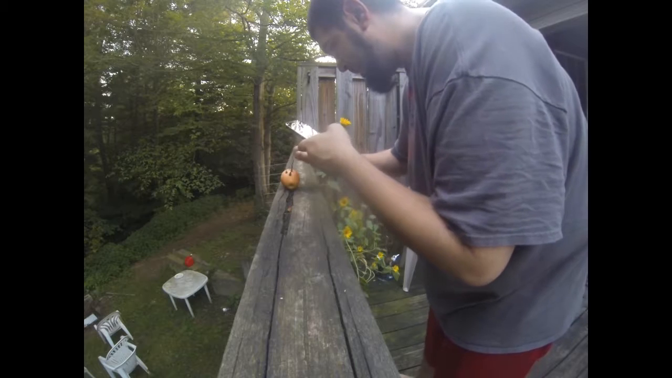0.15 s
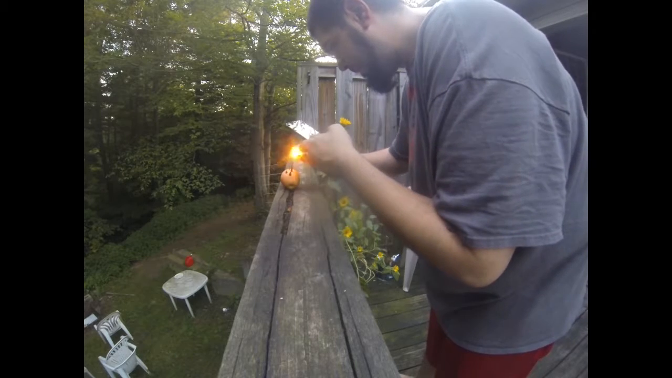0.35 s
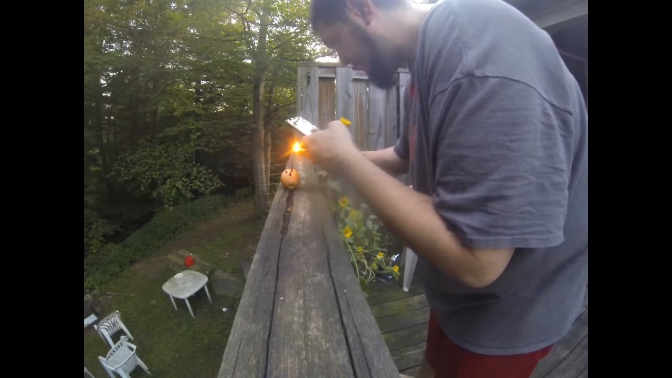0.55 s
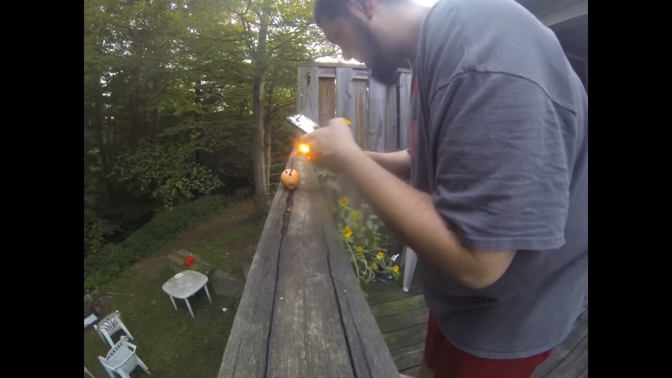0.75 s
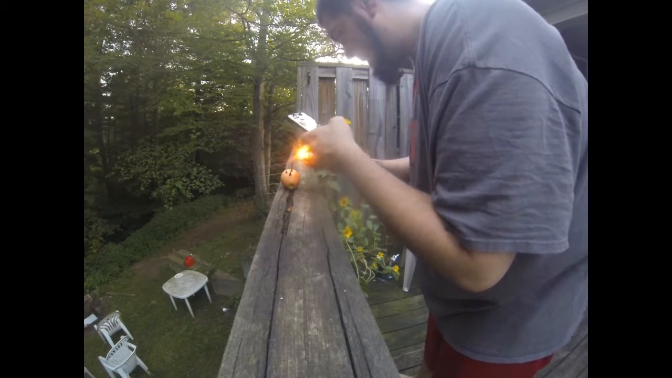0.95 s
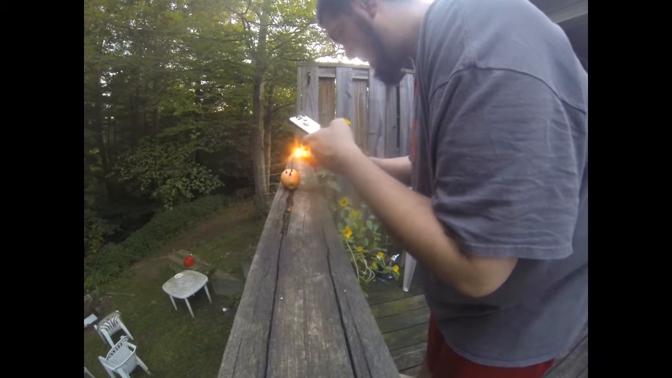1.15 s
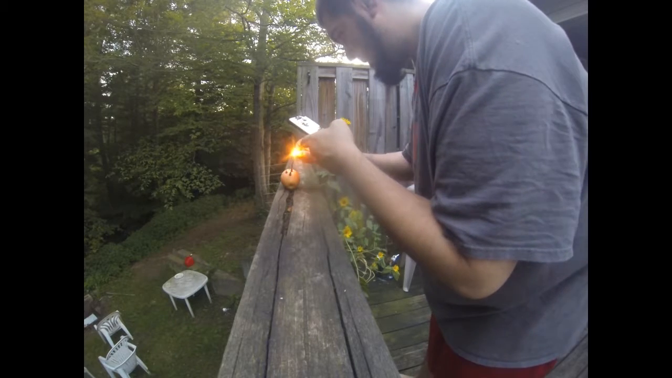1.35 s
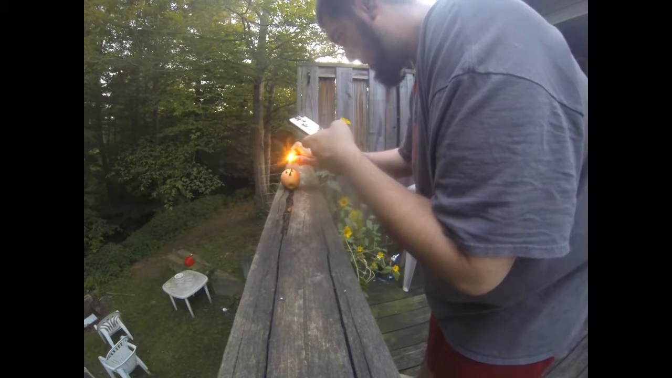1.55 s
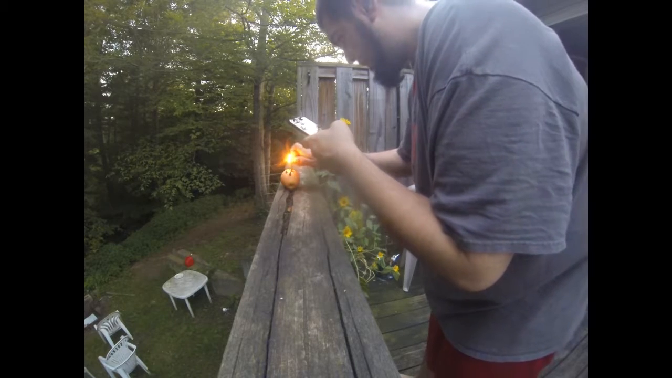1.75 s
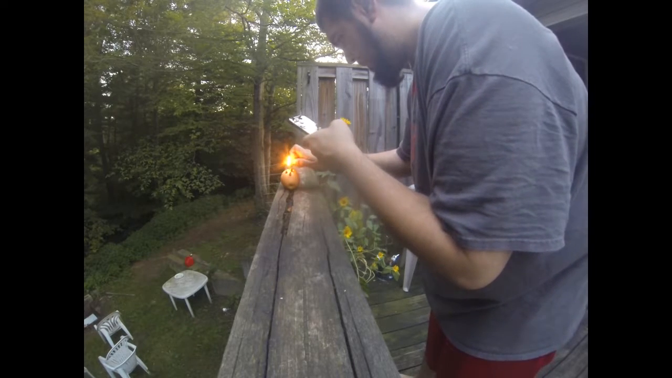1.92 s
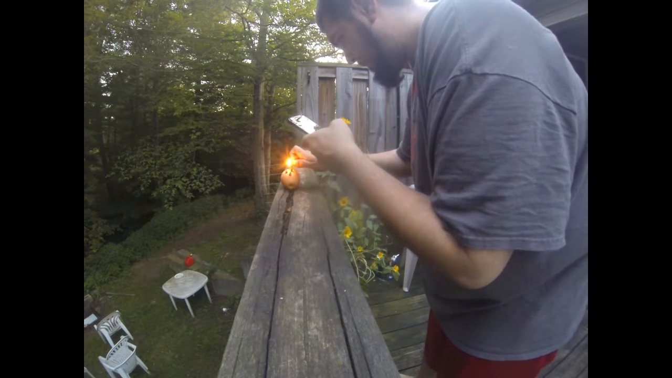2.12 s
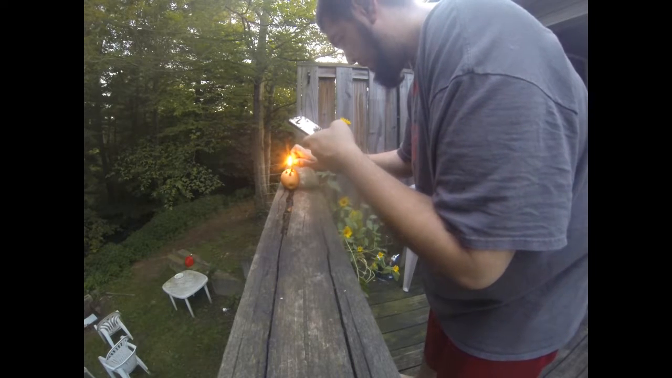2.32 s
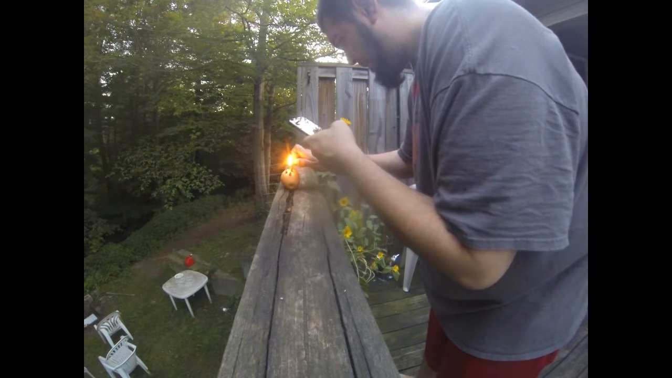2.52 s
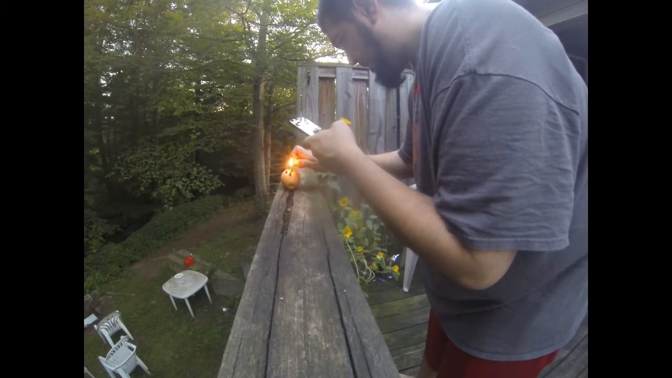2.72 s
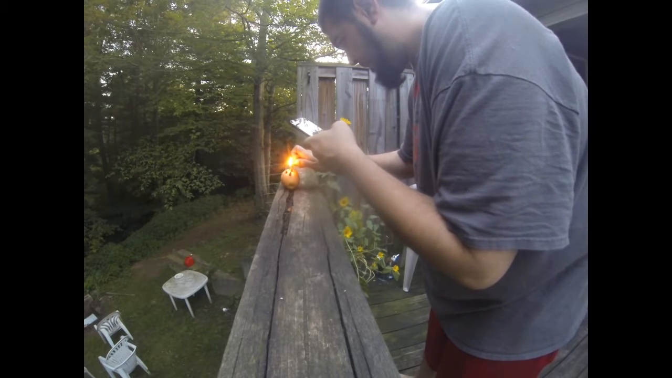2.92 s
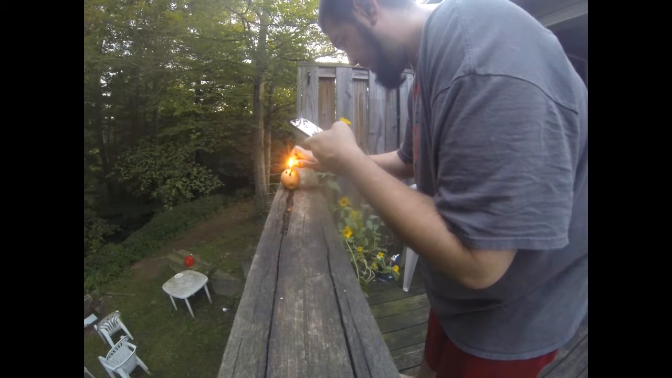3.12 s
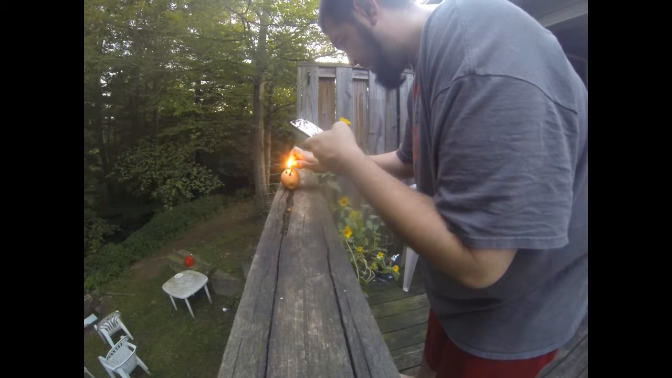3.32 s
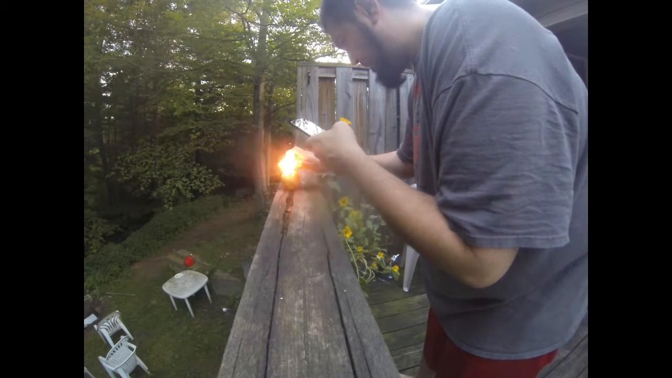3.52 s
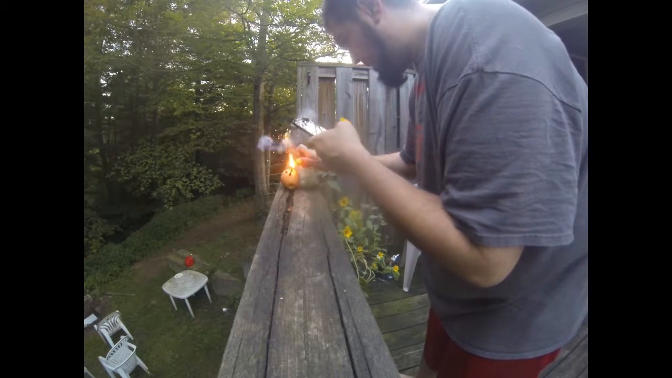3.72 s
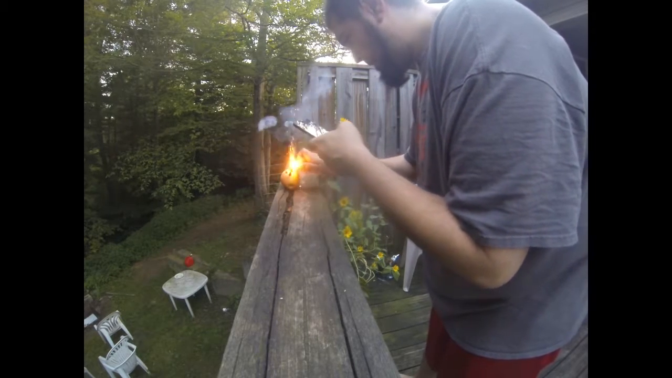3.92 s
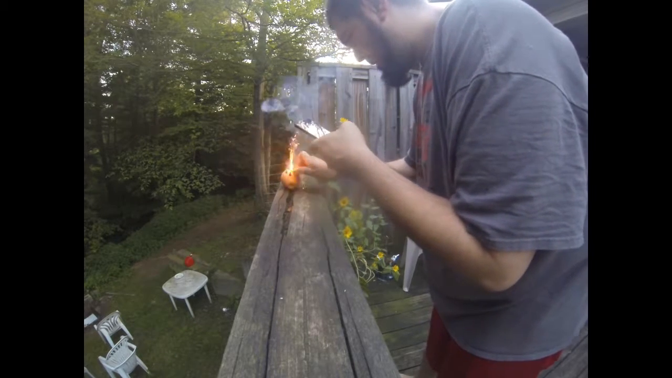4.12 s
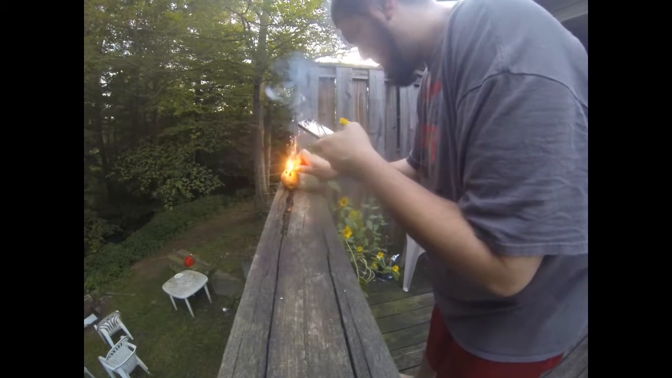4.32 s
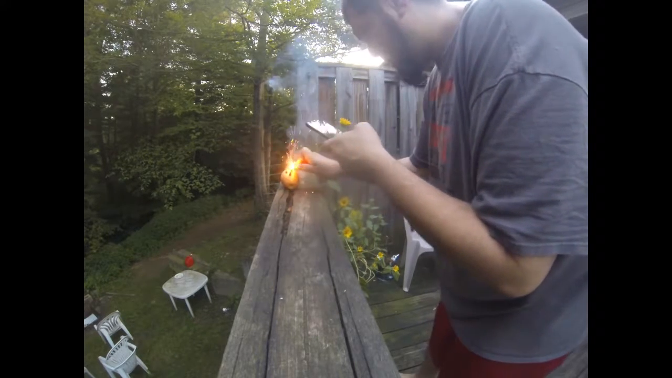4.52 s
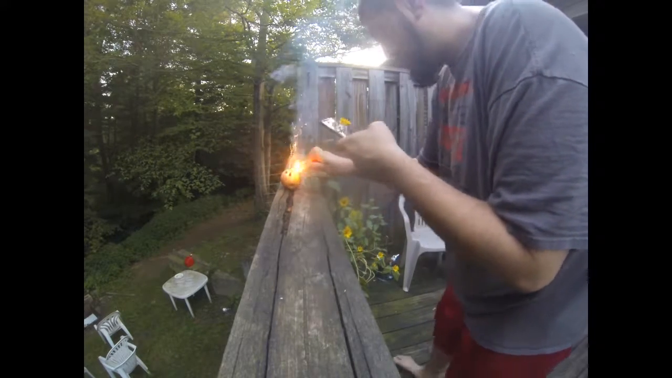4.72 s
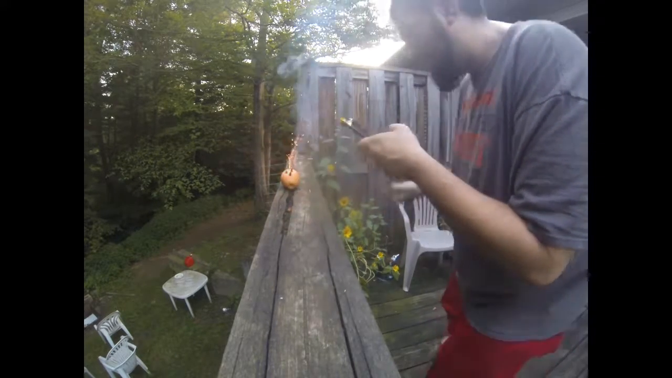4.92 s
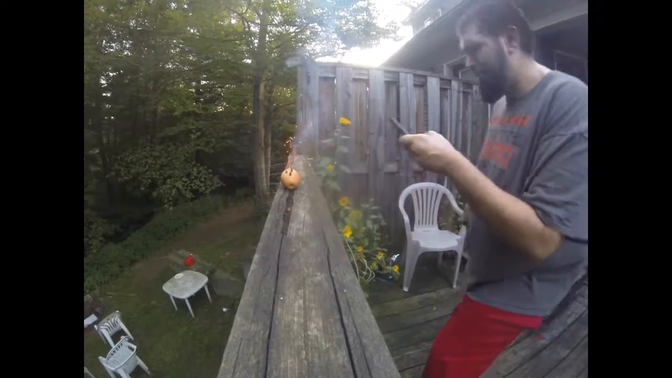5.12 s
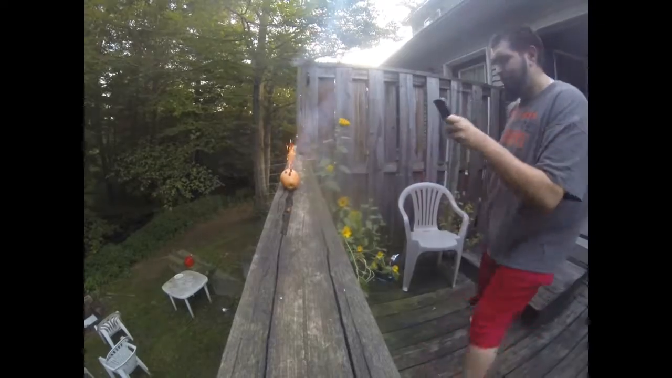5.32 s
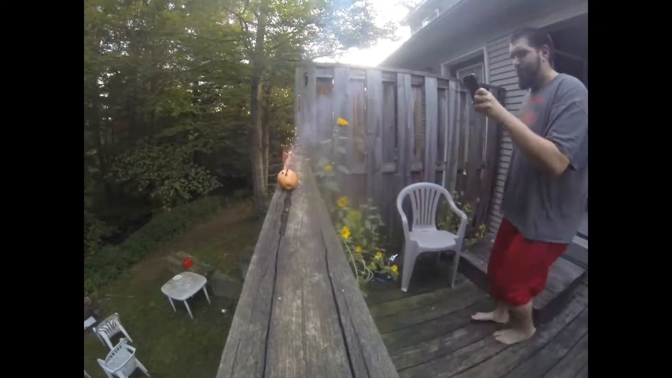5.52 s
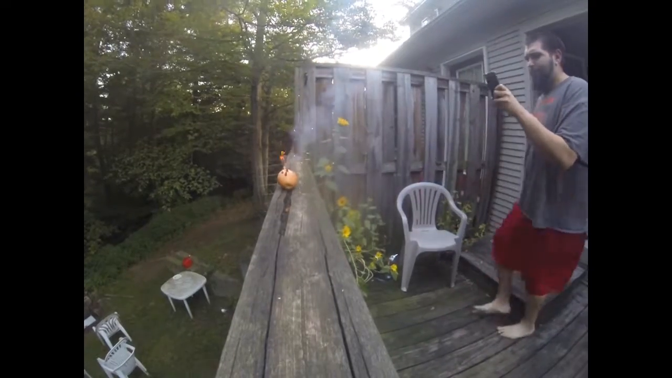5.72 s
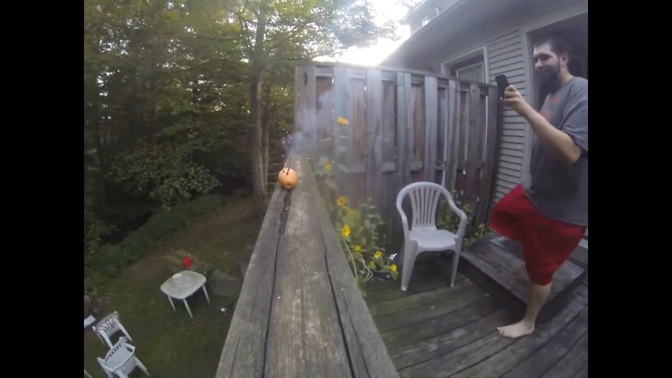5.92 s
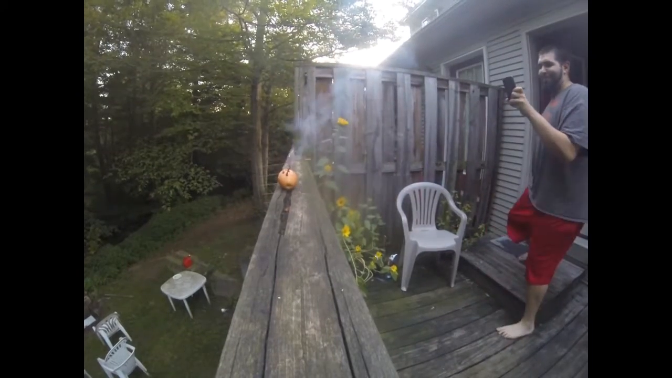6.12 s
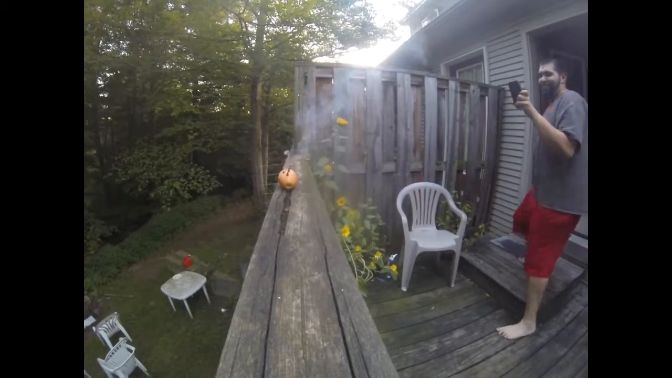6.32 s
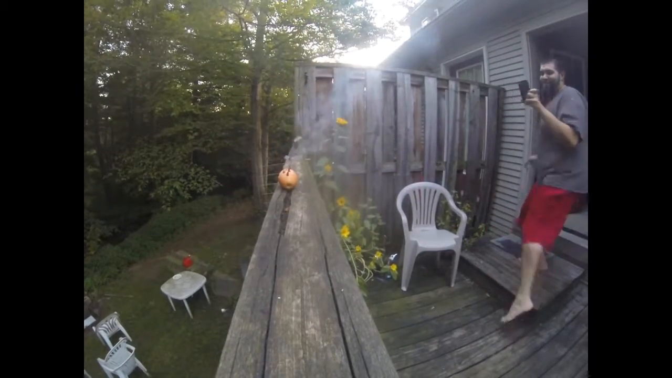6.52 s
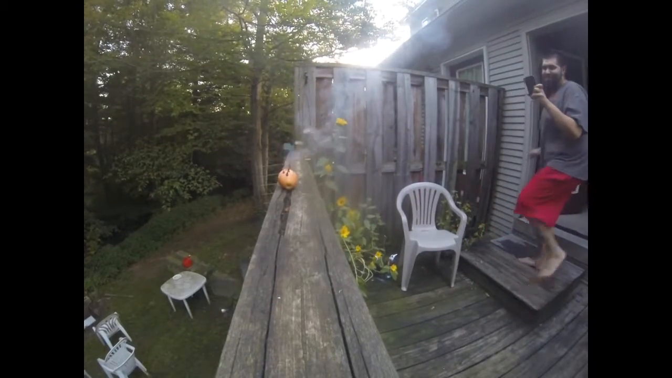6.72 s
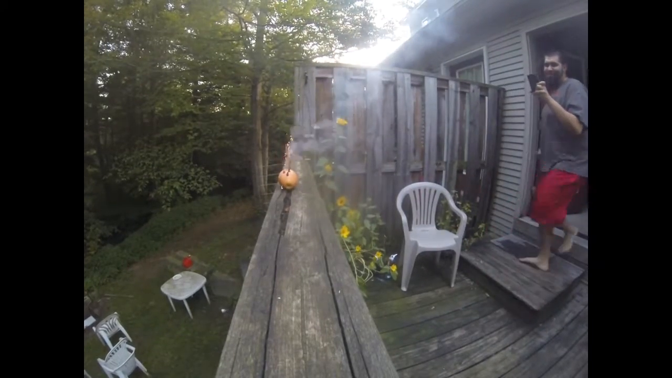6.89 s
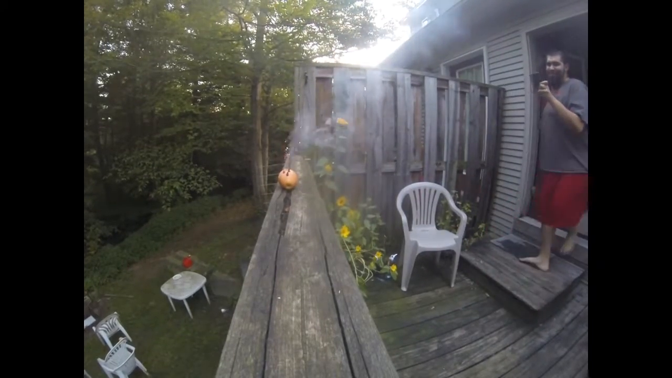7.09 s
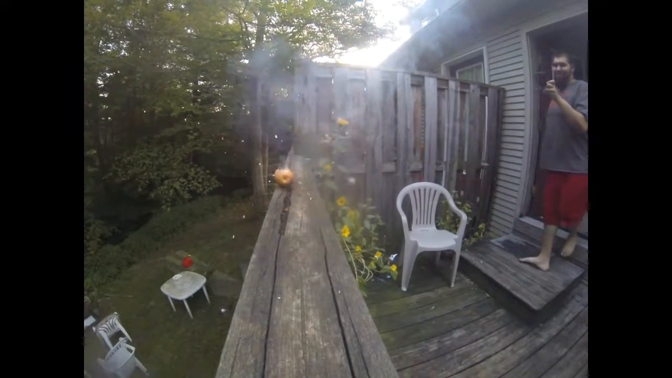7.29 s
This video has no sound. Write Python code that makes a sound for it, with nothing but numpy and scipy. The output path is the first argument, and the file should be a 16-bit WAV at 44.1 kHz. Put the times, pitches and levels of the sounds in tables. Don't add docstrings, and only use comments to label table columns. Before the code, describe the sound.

Low distant engine throb and open-air hiss, a lighter click, faint fuse fizz, hurried knocks and thuds on wood, then one overloaded firecracker bang with echoes.

```python
import sys
import numpy as np
from scipy import signal
from scipy.fft import rfft, irfft
from scipy.io import wavfile
from scipy.ndimage import uniform_filter1d

SR = 44100
rng = np.random.default_rng(int(sys.argv[2]) if len(sys.argv) > 2 else 0)


def volts_from_decibels(level):
    exponent = np.asarray(level, float) / 20
    return 10 ** exponent


def file_out(sig):
    cols = np.atleast_2d(sig).T
    lim = np.clip(cols, -1, 1)
    pcm = np.round(lim * 32767).astype(np.int16)
    wavfile.write(sys.argv[1], SR, pcm)


N = 324135
TIME = np.arange(N) / SR
BURST_S = 7.04803

# f/Hz, level/dB [per Hz]
FIZZ_COLOUR = [(700, -29.5), (1500, 3), (3000, 5.5), (4300, -6), (5500, -9.5), (7200, -12.5), (8700, -4.5),
               (10000, -10.5), (11400, -11.5), (13000, -16.5), (15500, -34.5)]


def in_time(rows):
    s, *columns = np.transpose(rows)
    return [np.interp(TIME, s, c) for c in columns]


def rms_one(x):
    return x / np.sqrt(np.mean(x ** 2) + 1e-20)


def drift(rate_hz):
    count = int(N / SR * rate_hz) + 2
    return rms_one(np.interp(TIME * rate_hz, np.arange(count), rng.standard_normal(count)))


def coloured(points):
    hz = np.maximum(np.fft.rfftfreq(N, 1 / SR), 1)
    point_hz, point_db = np.transpose(points)
    gain = volts_from_decibels(np.interp(np.log(hz), np.log(point_hz), point_db))
    return rms_one(irfft(rfft(rng.standard_normal(N)) * gain, N))


def band(x, low_hz, high_hz, order=2):
    return signal.sosfilt(signal.butter(order, [low_hz, high_hz], "band", fs=SR, output="sos"), x)


def low_pass(x, hz, order=2):
    return signal.sosfilt(signal.butter(order, hz, fs=SR, output="sos"), x)


def lift(x, hz, width_hz, db):
    r = np.exp(-np.pi * width_hz / SR)
    feedback = [1, -2 * r * np.cos(2 * np.pi * hz / SR), r * r]
    peak = signal.lfilter(np.array([1, 0, -1]) * (1 - r * r) / 2, feedback, x)
    return x + (volts_from_decibels(db) - 1) * peak


def swell(rows, rise_db_per_s, fall_db_per_s):
    total = np.zeros(N)
    for start, end, db in rows:
        rise = rise_db_per_s * np.maximum(start - TIME, 0)
        fall = fall_db_per_s * np.maximum(TIME - end, 0)
        total += volts_from_decibels(np.maximum(db - rise - fall, -200))
    return total


def bell(centre_s, width_s):
    return np.exp(-((TIME - centre_s) / width_s) ** 2)


def struck(events, modes, level_db, rattle_s, contact_hz):
    out = np.zeros(N)
    lag = np.arange(round(.04 * SR)) / SR / rattle_s
    rattles = rng.standard_normal((len(events), len(lag))) * lag * np.exp(-lag)
    heard = slice(round(events[0][0] * SR), round((events[-1][0] + .4) * SR))
    spot_db = 2.34 * rng.standard_normal((len(events), len(modes)))
    for (hz, db, t60), spots in zip(modes, spot_db.T):
        drive = np.full(N, 1e-18)
        for (s, peak_db, bright_db), rattle, spot in zip(events, rattles, spots):
            at = round(s * SR)
            at_mode = abs(rattle @ np.exp(2j * np.pi * hz * lag * rattle_s))
            push = np.hypot(at_mode, 0.71 * np.linalg.norm(rattle))
            blow_db = peak_db + db + level_db + spot + bright_db * np.log2(hz / 600)
            drive[at:at + len(lag)] += volts_from_decibels(blow_db) * rattle / push
        r, w = volts_from_decibels(-60 / (t60 * SR)), 2 * np.pi * hz / SR
        out[heard] += signal.lfilter([0, np.sin(w)], [1, -2 * r * np.cos(w), r * r], drive[heard])
    return band(out + 1e-18, 290, contact_hz, order=4)


def outdoors():
    # f/Hz, level/dB [per Hz]
    air_colour = [(15, -42), (28, -6.5), (48, -13.5), (110, -9), (200, -8.5), (335, -18), (543, -24),
                  (879, -19.5), (1540, -32.5), (2020, -26.5), (2560, -38.5), (5140, -53.5), (7090, -61.5),
                  (12500, -65), (15000, -71.5)]
    level_db = -39.5 + 1.5 * bell(5.06, 1) + 4.5
    return volts_from_decibels(level_db + 0.54 * drift(6)) * coloured(air_colour)


def insect():
    # start t/s, end t/s, level/dB
    calls = [(1.1, 1.13, -82), (1.19, 1.23, -76), (1.26, 1.42, -81), (2.697, 3.08, -80), (4.48, 4.69, -80),
             (6.94, 6.97, -81)]
    gate = np.zeros(N)
    for start, end, db in calls:
        gate += volts_from_decibels(db) * np.sin(np.pi * np.clip((TIME - start) / (end - start), 0, 1)) ** .5
    return gate * volts_from_decibels(4 * drift(45)) * rms_one(band(rng.standard_normal(N), 7850, 8120))


def engine():
    # t/s, f/Hz [firings per s]
    firing_rate = [(0, 17.07), (1.75, 16.85), (3.25, 16.67), (4.75, 16.57), (7.35, 16.38)]
    # multiple of the firing rate, level/dB
    orders = [(1, -9), (2, -8), (3, -31), (4, -5), (5, 11), (6, -4.5), (7, -13), (8, -12), (9, -4.5),
              (10, -1), (11, -8), (12, -3.5), (13, -1.5), (14, -12), (15, -10.5), (16, -10), (17, -5.5),
              (18, -15)]
    # t/s, level/dB
    boom_swells = [(0, -36), (.7, -38), (.82, -31), (1.15, -37), (1.45, -43), (2.3, -40), (2.9, -37),
                   (3.3, -31.5), (4.05, -30), (4.6, -36.5), (4.9, -28), (5.15, -32), (5.31, -39.5),
                   (5.52, -27), (5.75, -28.5), (6.28, -36.5), (6.65, -34), (7.05, -33.5)]
    speed, = in_time(firing_rate)
    boom_db, = in_time(boom_swells)

    nearest_s, passing_s, fade_db = 3.22, 3.2, 7
    hiding_db = 3.5 * np.clip(TIME - 5.07, 0, 1.3)
    high_db = -30 - fade_db * (1 - bell(nearest_s, passing_s)) - hiding_db
    lower_db = -36 - 1.7 * fade_db * (1 - bell(nearest_s + .9, passing_s / 2))

    boost_hz, boost_ends_hz, sag_s = 233, 148.2, 2.05
    centre_hz = boost_ends_hz + (boost_hz - boost_ends_hz) * np.exp(-TIME / sag_s)
    wall = volts_from_decibels(9.5) * bell(6.4, 0.66)

    turns = np.cumsum(speed) / SR
    turns -= turns[round(2.879 * SR)]
    waves = {}
    for k, db in orders:
        phase = 2 * np.pi * (k * turns + .03 * drift(1.5))
        waves[k] = volts_from_decibels(db + 1.5 * drift(2.5)) * np.cos(phase)
    rest = sum(waves[k] for k in (1, 2, 3, 6, 7))
    high = np.zeros(N)
    for k in range(8, 19):
        ground_lift = np.exp(-((k * speed - centre_hz) / 26) ** 2)
        wall_lift = wall * np.exp(-((k * speed - 237) / 16) ** 2)
        high += waves[k] * (0.23 + ground_lift + wall_lift)

    twin_turns = turns + (4.6 * (TIME - 2.755) + .5) / 5
    twin = volts_from_decibels(-41.5) * np.cos(10 * np.pi * twin_turns) + volts_from_decibels(-48) * np.cos(8 * np.pi * twin_turns)
    whine = volts_from_decibels(-50.5) * bell(4.75, .35) * np.cos(48 * np.pi * turns)

    boom = volts_from_decibels(boom_db + 0.62) * rms_one(waves[5])
    lower = volts_from_decibels(lower_db - 2.5) * rms_one(waves[4])
    upper = volts_from_decibels(high_db - 0.52) * rms_one(high)
    return np.sqrt(2) * (twin + whine) + boom + lower + volts_from_decibels(-48.5) * rms_one(rest) + upper


def camera_whine():
    frame = TIME * 47.952 + .74
    on = uniform_filter1d((frame % 1 < .41) * 1., size=30)
    turns = 6440 * TIME + rng.random(int(frame[-1]) + 1)[frame.astype(int)]
    return on * (volts_from_decibels(-71.5) * np.sin(2 * np.pi * turns) + volts_from_decibels(-72) * np.sin(4 * np.pi * turns))


def footsteps():
    # start t/s, end t/s, level/dB
    weight_shifts = [(4.65, 4.84, -41), (5.03, 5.04, -29), (5.19, 5.22, -23), (5.42, 5.45, -27.5),
                     (5.6, 5.65, -26.5), (5.8, 5.95, -34), (6.2, 6.5, -33)]
    # t/s, peak level/dB, brightness/dB [per octave]
    rail_knocks = [(4.969, -21, -10), (5.2068, -4, 0.5), (5.2088, -4, 1), (5.214, -6.5, -2),
                   (5.2768, -5.5, -5.5), (5.284, -13, -4.5), (5.3, -21, -7), (5.626, -10, -6),
                   (5.658, -21, -5)]
    # f/Hz, level/dB, t60/s
    rail_modes = [(428, -17, 0.11), (556, -7.5, 0.14), (630, -18, 0.055), (818, -7.5, 0.094),
                  (916, -0.5, 0.071), (1009, -0.5, 0.066), (1150, 0.5, 0.046), (1367, -1.5, 0.042),
                  (1463, 0, 0.038), (1688, -4, 0.051), (2010, -14, 0.018), (2140, -10, 0.046),
                  (2660, -18, 0.03), (3250, -21, 0.03), (3470, -30, 0.016), (4530, -19, 0.017)]
    # t/s, peak level/dB, brightness/dB [per octave]
    close_thuds = [(4.935, -24, 8), (4.97, -27, 7), (5.4378, 0.5, 0), (5.4405, -1.5, 5.5), (5.447, 1.5, -4),
                   (5.456, -2.5, -4.5), (5.47, -18, -4.5), (5.622, -9, -7), (5.632, -12.5, -7),
                   (5.658, -15, -2), (6.24, -28, 10)]
    # t/s, peak level/dB, brightness/dB [per octave]
    far_steps = [(4.505, -30, -6), (4.86, -25, -2), (5.715, -18.5, -3), (5.727, -17, -3),
                 (5.745, -21.5, -4), (6.003, -17, -9), (6.011, -13, -7), (6.026, -21, -5),
                 (6.118, -20.5, -7), (6.133, -22, -6)]
    # f/Hz, level/dB, t60/s
    deck_modes = [(262, -32, 0.048), (363, -7, 0.11), (410, -13.5, 0.034), (469, 2.5, 0.099),
                  (533, -4, 0.079), (595, -8, 0.075), (636, -11, .05), (740, -6.5, 0.045),
                  (789, -7.5, .055), (940, -20, .04)]
    # start t/s, end t/s, level/dB
    drags = [(5.2, 5.3, -55.5)]
    # start t/s, end t/s, level/dB
    rubs = [(5.19, 5.32, -48), (5.405, 5.415, -46.5), (5.625, 5.665, -49), (5.71, 5.73, -52)]

    flexing = rms_one(band(rng.standard_normal(N), 12, 42))
    sway = swell(weight_shifts, rise_db_per_s=300, fall_db_per_s=89) * volts_from_decibels(-1.5) * flexing
    scuff = swell(drags, rise_db_per_s=1200, fall_db_per_s=600) * volts_from_decibels(5 + 1.8 * drift(60))
    scuff = scuff * coloured(FIZZ_COLOUR)
    rubbing = rms_one(band(rng.standard_normal(N), 900, 2500))
    grit = swell(rubs, rise_db_per_s=600, fall_db_per_s=300) * volts_from_decibels(3.9 * drift(90)) * rubbing
    knocks = struck(rail_knocks, rail_modes, level_db=-12, rattle_s=0.00088, contact_hz=3750)
    thuds = struck(close_thuds, deck_modes, level_db=-8.5, rattle_s=0.0011, contact_hz=900)
    steps = struck(far_steps, deck_modes, level_db=-9.0, rattle_s=0.0017, contact_hz=610)
    return knocks + thuds + steps + sway + scuff + grit


def ticks():
    # t/s, peak level/dB, build-up/s, t60/s
    tick_times = [(.203, -41, 0.0031, 0.021), (.21, -56, .002, 0.074), (5.187, -57, .002, .05),
                  (5.209, -48, .001, .03), (5.257, -51, .003, .05), (5.414, -51, .001, 0.018),
                  (5.4493, -46, .001, .012), (5.64, -54, .001, .03), (6.015, -53, .0005, .01),
                  (6.19, -60, .0005, .01)]
    envelope = np.zeros(N)
    for s, db, rise_s, t60 in tick_times:
        build_up = np.exp(np.clip((TIME - s) / rise_s, -30, 0))
        decay = volts_from_decibels(-60 * np.clip((TIME - s) / t60, 0, 4))
        envelope += volts_from_decibels(db) * np.where(TIME < s, build_up, decay)
    return envelope * volts_from_decibels(5) * coloured(FIZZ_COLOUR)


def lighter():
    # t/s, peak level/dB, brightness/dB [per octave]
    click = [(.2045, -24, 0)]
    # f/Hz, level/dB, t60/s
    case_modes = [(1690, 0.5, 0.02), (2030, -5, .015), (3080, -10.5, 0.011)]
    return struck(click, case_modes, level_db=-2.0, rattle_s=0.00053, contact_hz=5000)


def fuse():
    # start t/s, end t/s, level/dB
    flares = [
        (3.4, 3.45, -72),
        (4.7, 5.0, -75),
        (6.78, 6.84, -67.5),
    ]
    lit_s = 3.39
    burn = (TIME > lit_s) * volts_from_decibels(-74.5 + 1.3 * (TIME - lit_s))
    burn = np.hypot(burn, swell(flares, rise_db_per_s=150, fall_db_per_s=40))
    return burn * volts_from_decibels(4 + 2.2 * drift(30)) * (TIME < BURST_S) * coloured(FIZZ_COLOUR)


def blast():
    # delay/ms, push/ms, suction/ms, level/dB
    shock_times = [(0, .36, .26, 34), (.62, .82, .66, 37), (2.06, .46, .3, 29), (3.05, .3, .6, 10),
                   (5.2, .5, .6, 6), (21.4, .16, .16, 17)]
    # f/Hz, level/dB [per Hz]
    echo_colour = [(100, -9), (320, -5.5), (520, -4.5), (900, 5.5), (1400, -4), (2100, -1.5), (2700, -3),
                   (3250, 1), (3800, -6), (5370, -12.5), (7050, -27), (8800, -19), (11000, -29.5),
                   (15000, -40.5)]
    # start t/s, end t/s, level/dB
    near_echo = [(7.054, 7.072, -18.5)]
    # start t/s, end t/s, level/dB
    far_echo = [(7.103, 7.113, -27.5)]
    tree_line_end_s = 7.22
    ms = (TIME - BURST_S) * 1000

    shocks = np.zeros(N)
    for lag, push, pull, db in shock_times:
        corners_ms = [-.02, .02, push, push + pull / 2, push + pull]
        shocks += volts_from_decibels(db) * np.interp(ms - lag, corners_ms, [0, -0.58, 0.14, 1.0, 0])

    near = swell(near_echo, rise_db_per_s=900, fall_db_per_s=900) * (ms > 3)
    far = swell(far_echo, rise_db_per_s=200, fall_db_per_s=58.5) * (ms > 3)
    far *= volts_from_decibels(-60 * np.clip(TIME - tree_line_end_s, 0, .06))
    far_treble = far * volts_from_decibels(5 - 25 * np.maximum(TIME - tree_line_end_s, 0))

    echoes = coloured(echo_colour) * volts_from_decibels(1.2 * drift(250))
    dull = low_pass(echoes, 5500)
    wash = np.hypot(near, far) * dull + (echoes - dull) * np.hypot(near, far_treble)
    wash = wash + near * (lift(dull, hz=2950, width_hz=830, db=5) - dull)

    shaking = rms_one(band(rng.standard_normal(N), 600, 1170)) * np.clip(ms - 3.5, 0, 1)
    shaking *= volts_from_decibels(6 - 60 * np.maximum(TIME - BURST_S, 0) / .12)
    return low_pass(shocks, 4500) + shaking + volts_from_decibels(19.5) * wash


def scene():
    # f/Hz, width f/Hz, lift level/dB
    case_resonances = [(950, 510, -2.5), (1434, 22, 6.5), (1672, 62, 6.5), (2060, 88, 5), (3180, 210, 1),
                       (4220, 970, -3.5), (5180, 480, 8.5), (10200, 1200, 0.5)]
    air = outdoors() + insect() + ticks() + fuse()
    for hz, width_hz, db in case_resonances:
        air = lift(air, hz, width_hz, db)
    return (air + engine() + camera_whine() + footsteps() + lighter() + blast())[None]


def band_limit(x):
    return signal.sosfilt(signal.butter(12, 15280, fs=SR, output="sos"), x)


def record(dry):
    duck_db, look_ahead_s, recovery_db_per_s = 22.5, .017, 15
    overload_s = np.argmax(np.abs(dry[0]) > 2) / SR
    since = TIME - (overload_s - look_ahead_s)
    ducking_db = np.clip(since / 0.0038, 0, 1) * np.maximum(duck_db - recovery_db_per_s * since, 0)
    clipped = np.clip(dry * volts_from_decibels(-ducking_db), -1, 1)
    smooth = low_pass(clipped, 15000, order=8)
    return band_limit(np.clip(smooth, -1, 1))


dry = scene()
out = record(dry)
file_out(out)
```